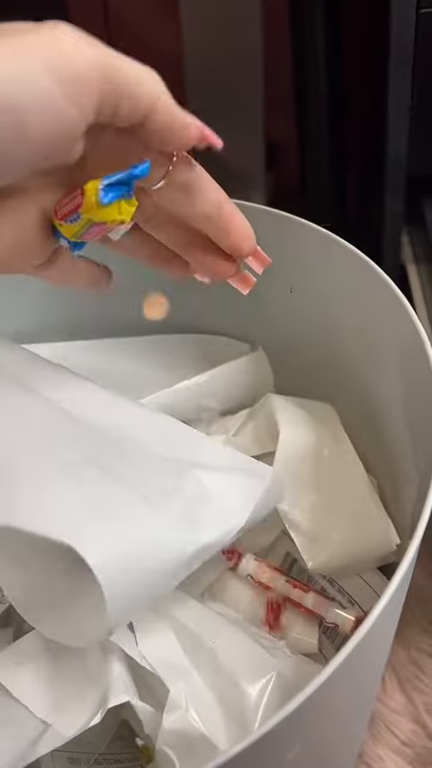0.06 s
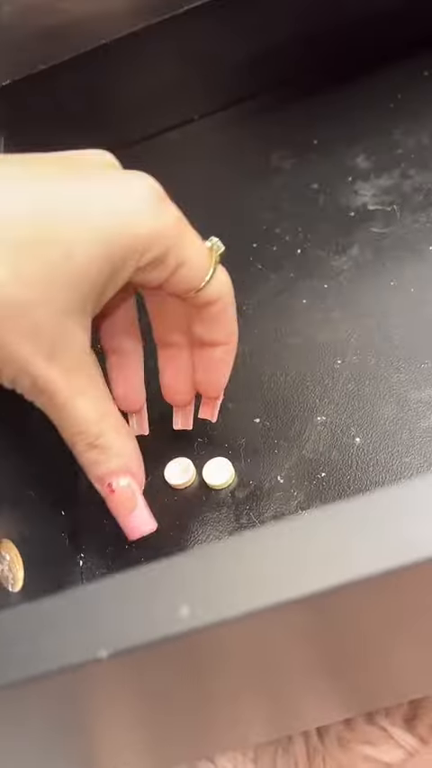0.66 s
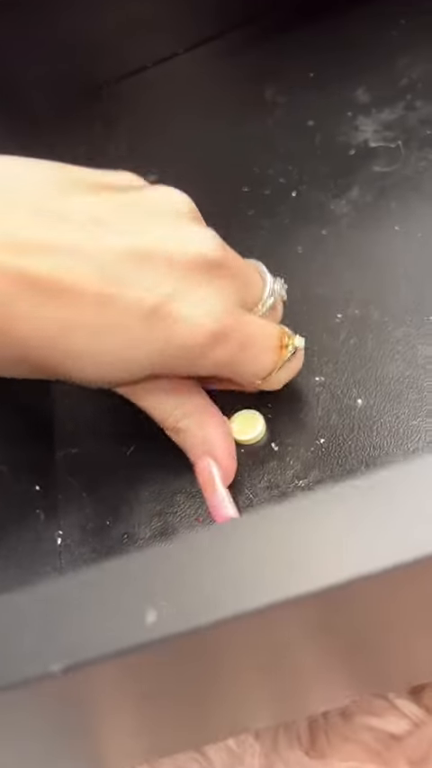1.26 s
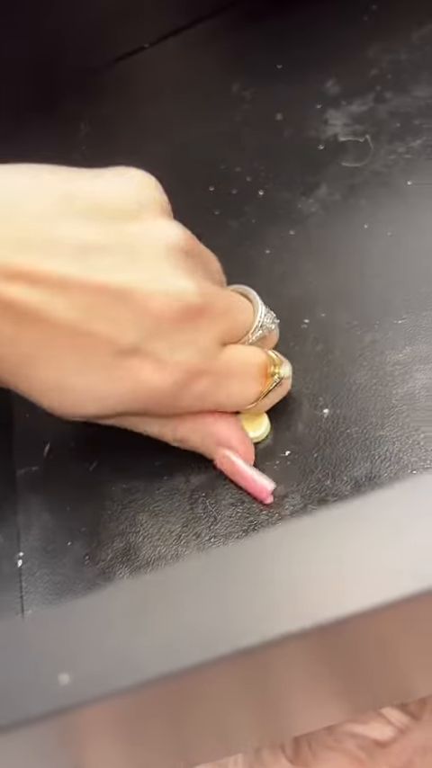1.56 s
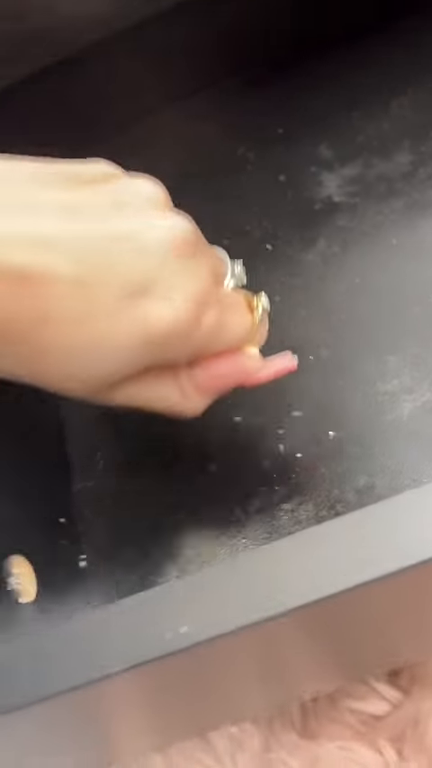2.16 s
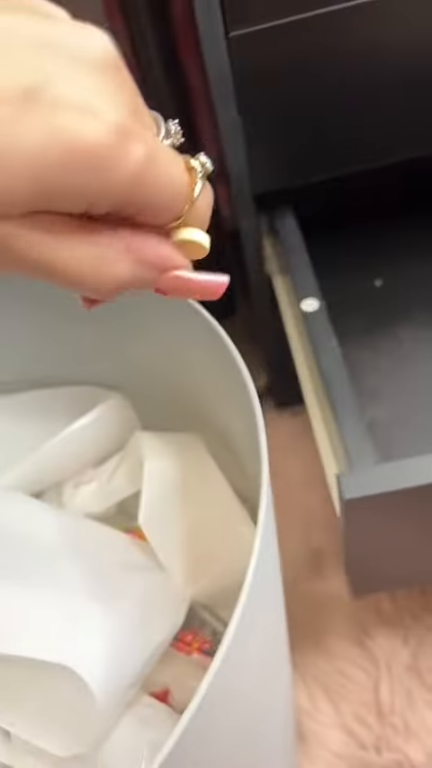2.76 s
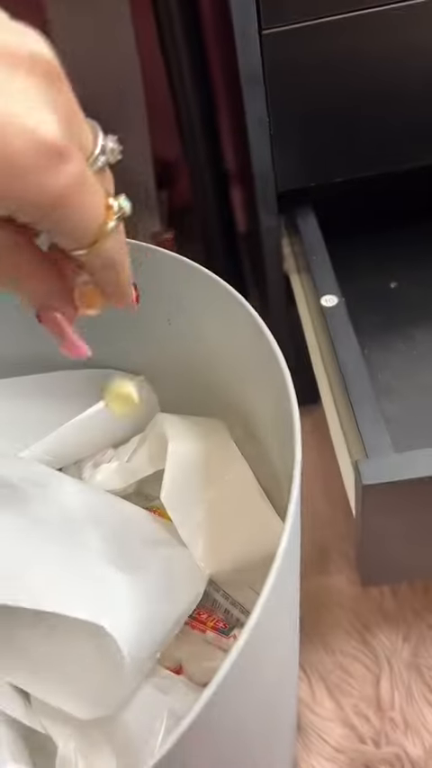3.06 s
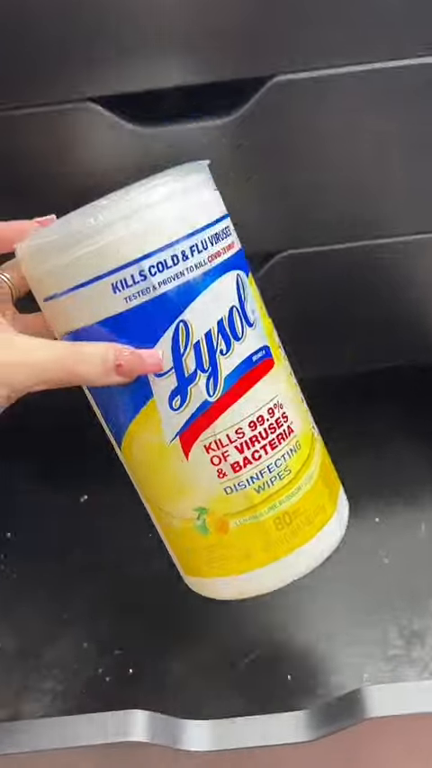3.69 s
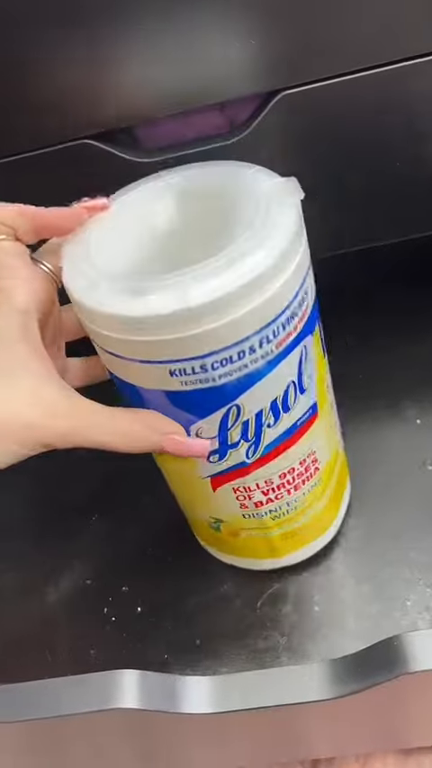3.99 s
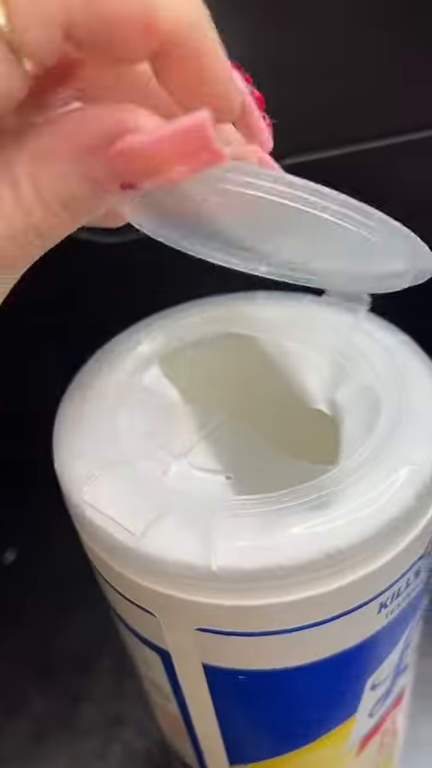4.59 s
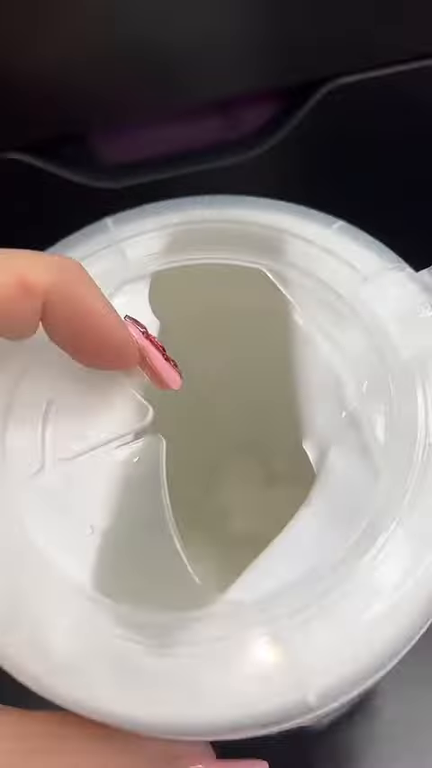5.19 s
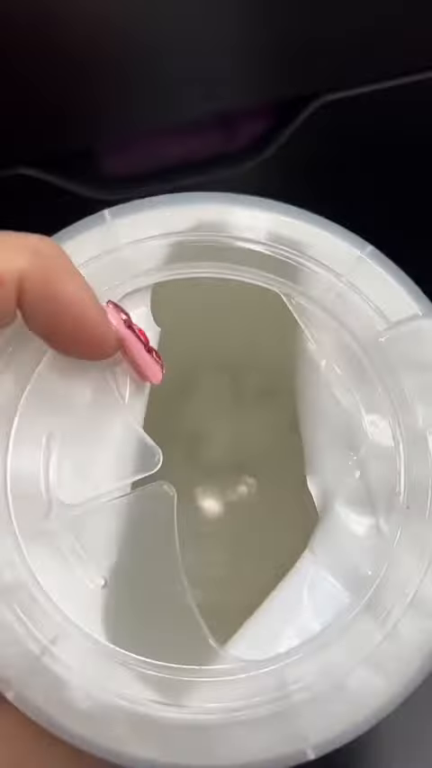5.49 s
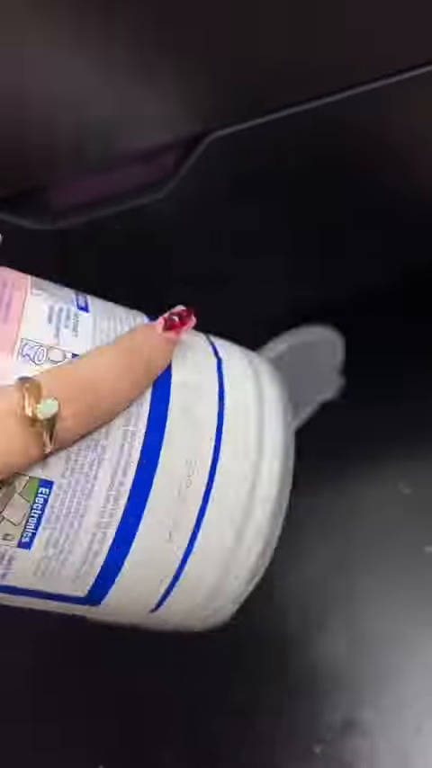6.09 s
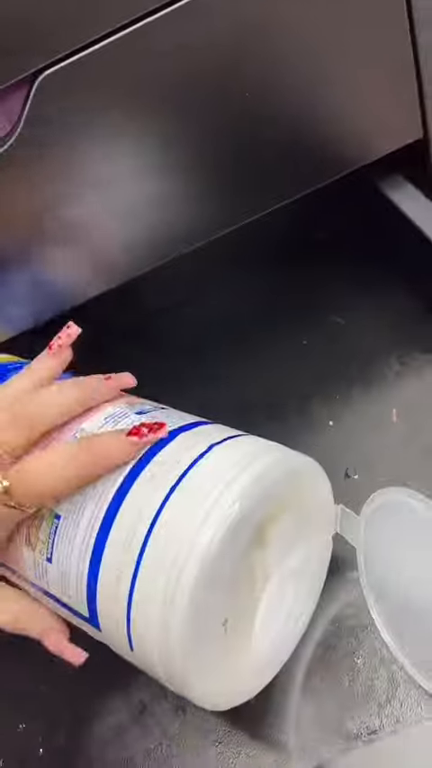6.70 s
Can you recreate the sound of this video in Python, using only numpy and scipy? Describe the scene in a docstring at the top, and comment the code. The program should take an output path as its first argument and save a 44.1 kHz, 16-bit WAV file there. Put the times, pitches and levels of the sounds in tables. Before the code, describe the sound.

Close up in a small, soft-sounding room, candies land in a wastebasket with light clicks, little thumps and a crinkle of paper. Quiet scrapes and taps of fingernails on a drawer follow, then a second short clatter in the bin. The low room hum recedes as a plastic canister is handled: finger rubs, sparse lid snaps, and finally a quick run of hollow knocks with a short scraping roll.

```python
"""Candies, bin and wipes canister

Close to the microphone in a small, soft room with a low hum, hard candies drop into a paper-filled
plastic bin, and long nails slide and pinch more of them off a drawer bottom. A plastic wipes canister
is picked up, snapped open, tipped over and knocked about on the drawer. Blows ring each object's modes;
rubbing is a stream of tiny slips. It all comes in five stretches with short silences between."""
import sys
import numpy as np
from scipy import signal
from scipy.fft import rfft, irfft, next_fast_len
from scipy.io import wavfile

SR = 44100
rng = np.random.default_rng(int(sys.argv[2]) if len(sys.argv) > 2 else 0)


def pcm_store(signal):
    """Save signal as 16-bit PCM."""
    levels = np.round(np.clip(np.atleast_2d(signal), -1, 1) * 32767)
    wavfile.write(sys.argv[1], SR, levels.astype(np.int16).T)


N = 302085

# Candies landing in the bin, close by. Each row: start in seconds, strength in dB, brightness in dB
# per octave, thump in dB, resonance of the struck spot in Hz, nominal t60 in seconds.
BIN_HITS = [(.014, -52.5, -3.7, 7, 191, 0.023), (0.07, -51.5, 5, 0.5, 1800, 0.032),
            (0.0982, -34, -.5, 6, 187, 0.1), (0.1432, -50.5, 4, 3.5, 5070, 0.015),
            (0.18, -45.5, 1, 10.5, 189, 0.2), (.209, -41.5, -.6, -1.5, 193, .057),
            (.234, -36.5, -1.5, 2, 3040, 0.056), (0.2788, -42.5, 5.5, -2, 4200, 0.034),
            (0.3125, -36, 1.5, -11, 1570, 0.071), (.3279, -37.5, 3.5, 6.5, 5080, .08),
            (0.337, -40, 2.1, -2.5, 2710, 0.12), (.371, -42, 4.5, 8.5, 4320, .028),
            (0.4163, -36.5, 2.5, 4.5, 212, 0.034), (.493, -32.5, 1.1, -15, 2090, 0.016),
            (0.5066, -43.5, 1, -4, 1510, .08), (0.535, -39.5, -2.4, -4, 200, .08),
            (0.6508, -54, -5.5, -8, 970, .021), (3.1682, -37.5, 0.7, -8, 3200, 0.033),
            (3.2546, -48, 2.5, -12, 1940, 0.017), (3.3106, -40.5, 1, 2.5, 3630, 0.052),
            (3.3404, -31, 3.4, 9, 2440, 0.023), (3.3776, -43.5, -2.5, -12, 191, .041),
            (3.4135, -59, 7, 25.5, 2150, .033), (3.4746, -39.5, 1.2, -14, 2950, 0.041),
            (3.4952, -44.5, -1.3, 2, 180, .058), (3.534, -50.5, -1, -10, 1015, 0.016)]
# The bin wall's modes. Each row: pitch in Hz, relative level in dB, nominal t60 in seconds.
BIN_MODES = [(181.5, 3.5, 0.076), (218, -7, 0.084), (448, 1, 0.059), (790, -4.5, 0.076),
             (1006, -11.5, 0.055), (1640, -7, 0.02), (1880, -2.5, 0.022), (2102, 7, 0.017),
             (2587, -1.5, 0.052), (3380, -7, 0.015), (4040, -5.5, .02), (4800, -1.5, 0.016)]
# Paper and wrappers giving way under the two drops.
# Each row: time in seconds, level in dB, brightness in dB per octave.
FIRST_CRUMPLE = [(0, -38.5, -1), (.11, -43.5, 1), (.22, -45, 0.5), (.26, -57, -8), (.305, -48.5, -0.5),
                 (.33, -38.5, -1), (.4, -40.5, -2.5), (.45, -50, -0.5), (.66, -51, -1)]
SECOND_CRUMPLE = [(3.166, -34.5, 1.8), (3.18, -34, 1.6), (3.201, -49.5, 0.23), (3.305, -58.5, 0.27),
                  (3.35, -39.5, -0.51), (3.4, -55, 0.23), (3.45, -76, 0), (3.49, -47, -1),
                  (3.54, -62, -0.54)]


def waste_bin():
    """Candies fall on crumpled paper and against the bin wall, which booms."""
    drops = blows(BIN_HITS, BIN_MODES, colour_db=(0.5, -2, 0, 0.5, -8), impact_db=24,
                  focus_db=3, spot_db=0, ping_db=-2.5, spot_q=2.4,
                  graze_db=10, graze_s=0.0014, hardening=0.56, crack_db=6.5, crack_t60=0.0027,
                  rattle_db=12.5, low_stretch=0.62, tail_db=-8, tail_t60=0.092)
    paper = friction([FIRST_CRUMPLE, SECOND_CRUMPLE], BIN_HITS, BIN_MODES,
                     colour_db=(-0.5, -2, -0.5, 2.5, -1.5), slips_per_s=300, scatter_db=2.5,
                     slip_t60=0.0079, hiss_db=1, ring_db=-8.5, spot_db=-16, edge_s=0.004)
    return drops + boom() + paper


def boom(hz=182, boost_db=2, t60=0.11):
    """Every landing flexes the whole bin, which booms for longer than its wall rings."""
    out = np.zeros(N)
    for start, strength_db, _, thump_db, _, _ in BIN_HITS:
        add(out, start, ring([(hz, boost_db + strength_db + thump_db, t60)], 1, detune=0.048))
    return out


# Taps on the drawer bottom, the board's modes, and candies pushed across it, also close by.
# Rows read like the bin's hits, modes and crumples.
DRAWER_HITS = [(0.9664, -65, 3.2, 0, 4000, 0.061), (1.0206, -63.5, 2.4, -3, 2820, 0.13),
               (1.0815, -53.5, 0.4, -6, 2130, 0.076), (1.3789, -53.5, 2, -4, 860, 0.16),
               (1.4874, -36.5, -2.6, -17, 873, 0.059), (1.6192, -51, -.5, -7, 747, 0.36),
               (1.7247, -43.5, 1.8, -3, 784, 0.082), (1.7366, -41.5, 1.4, -2, 726, 0.066),
               (3.034, -76.5, 5, 0, 8600, .06)]
DRAWER_MODES = [(222, -2, 0.11), (320, -16.5, 0.088), (546, -9, 0.045), (660, -6, 0.1), (781, 1, 0.044),
                (910, -5, 0.024), (2130, -9, .012), (4050, -16.5, 0.02), (5650, -9, .012)]
CANDY_PUSH = [(.97, -62, 1), (1.07, -53.5, 2.5), (1.15, -44.5, 1.1), (1.22, -49.5, -0.87),
              (1.32, -49.5, -0.41), (1.36, -56, -1.2), (1.4, -45.5, -1.6), (1.69, -59, 0.32),
              (1.76, -55, -1.2)]


def drawer():
    """Nails push the candies together and pinch them off the board."""
    taps = blows(DRAWER_HITS, DRAWER_MODES, colour_db=(-1, 2.5, 1, 2, -2.5), impact_db=29,
                 focus_db=6, spot_db=4.5, ping_db=-11, spot_q=9.1,
                 graze_db=9, graze_s=0.0015, hardening=0.13, crack_db=-3, crack_t60=0.00773,
                 rattle_db=12, low_stretch=1.6, tail_db=-16, tail_t60=0.39)
    slides = friction([CANDY_PUSH], DRAWER_HITS, DRAWER_MODES,
                      colour_db=(-5.5, -4, 1, -5.5, -11), slips_per_s=790, scatter_db=-4,
                      slip_t60=0.021, hiss_db=-5, ring_db=-7.5, spot_db=-4, edge_s=0.02)
    return taps + slides


# The canister near the microphone: lid snaps and knocks, its modes, and its roll on the drawer.
# Rows read like the bin's hits, modes and crumples.
CANISTER_HITS = [(3.8886, -41, 0, -1, 521, 0.072), (4.0829, -54, -0.7, 2, 4260, 0.021),
                 (4.1391, -57, 2.7, 0.5, 3170, 0.021), (4.3894, -58, -5.5, 1, 930, 0.025),
                 (4.43, -45, -4.5, -4.5, 271, 0.046), (4.5297, -36, -3.5, -3.5, 2200, 0.015),
                 (4.5946, -62, -1, 8, 2066, 0.019), (4.79, -33.5, 0.05, 3, 270, 0.019),
                 (4.829, -48.5, -2.2, -0.5, 308, .11), (5.285, -67, -2.5, 1.5, 262, 0.037),
                 (5.6996, -31, -1.2, -1, 519, 0.05), (5.784, -59, -1, 11.5, 155, .042),
                 (5.848, -43.5, -2, -12, 154, 0.028), (6.0709, -30, -7, -16, 1256, 0.04),
                 (6.264, -51, 0, 11.5, 342, 0.079), (6.343, -33.5, -2.5, -4, 335, 0.035),
                 (6.4389, -36.5, -4.5, -19, 375, 0.038), (6.4609, -35.5, -3.5, -17, 230, 0.056),
                 (6.4945, -34.5, -4, 6, 324, .092), (6.5964, -34.5, -2.5, 7.5, 482, .069),
                 (6.6333, -36.5, -2.5, -16, 390, 0.045), (6.6389, -31.5, -8, -8, 325, 0.029),
                 (6.6482, -42.5, 3, 0, 333, 0.05), (6.7034, -43, -1, 3.5, 473, 0.068),
                 (6.746, -54.5, -1.5, 1.5, 220, .043)]
CANISTER_MODES = [(138.4, -4.5, 0.082), (221.3, -2, 0.088), (271, -8, 0.058), (336, 2, 0.078),
                  (404, 1.5, 0.03), (483.4, 0, 0.053), (538, -3.5, 0.041), (622, -10, 0.016),
                  (873, 3, 0.04), (1063, 5.5, 0.051), (1250, -12, 0.026), (1630, -12, 0.03),
                  (2246, 15, 0.029), (3018, 18.5, 0.0057), (4440, -5, 0.019)]
CANISTER_ROLL = [(6.435, -44, -3.5), (6.53, -40, 1), (6.635, -38, 0.3), (6.652, -25.5, 0.5),
                 (6.672, -29.5, -0.8)]
# Brief hissy swells just before two lid clicks (at 4.119 and 4.512 s); the other rows are finger rubs.
# Each row: start and end in seconds, level in dB, brightness in dB per octave.
RUBS_AND_SWELLS = [(3.881, 3.916, -43.5, -1.5), (3.927, 4.009, -61, 0), (4.026, 4.078, -65.5, -0.5),
                   (4.119, 4.132, -57, 4.5), (4.339, 4.417, -58, -2), (4.512, 4.538, -45.5, 2),
                   (4.753, 4.803, -40.5, -1.3), (4.784, 4.88, -53.5, -1), (5.174, 5.2, -64.5, -3.5),
                   (5.613, 5.648, -54, 2.7), (5.687, 5.718, -40, -6), (5.735, 5.844, -68, 3.5),
                   (5.837, 5.953, -49.5, -2), (6.031, 6.057, -58, 3), (6.103, 6.12, -42.5, -0.5),
                   (6.13, 6.312, -65, -.6), (6.325, 6.38, -41, -2.5), (6.7, 6.784, -55.5, -3)]


def canister():
    """The hollow canister snaps, knocks, scrapes and rolls."""
    knocks = blows(CANISTER_HITS, CANISTER_MODES, colour_db=(-6.5, -4.5, -0.5, 0, -7), impact_db=27,
                   focus_db=11, spot_db=2, ping_db=5, spot_q=3.8,
                   graze_db=15, graze_s=0.0038, hardening=0, crack_db=18, crack_t60=0.0071,
                   rattle_db=18.5, low_stretch=0.6, tail_db=-12.5, tail_t60=0.12)
    spans = [[(start, db, tilt), (end, db, tilt)] for start, end, db, tilt in RUBS_AND_SWELLS]
    rustle = friction(spans + [CANISTER_ROLL], CANISTER_HITS, CANISTER_MODES,
                      colour_db=(0, 2, 0.5, -0.5, -16.5), slips_per_s=1000, scatter_db=6,
                      slip_t60=0.018, hiss_db=-8, ring_db=-7.5, spot_db=-13.5,
                      edge_s=0.013, edge_share=0.084)
    return knocks + rustle


# Edges in Hz of the five bands of every colour_db: boom, body, knock, click, tick.
EDGES_HZ = [125, 280, 700, 1600, 5000, 16000]
BANDS = [signal.butter(3, pair, "band", fs=SR, output="sos") for pair in zip(EDGES_HZ, EDGES_HZ[1:])]
BAND_OCTAVES = np.log2(np.sqrt(np.multiply(EDGES_HZ[1:], EDGES_HZ[:-1])) / 1000)  # centres, from 1 kHz
BLOW_SAMPLES, RING_SAMPLES = int(0.025 * SR), int(0.2 * SR)
RING_TIME = np.arange(RING_SAMPLES) / SR


def blows(hits, modes, colour_db, impact_db, focus_db, spot_db, ping_db, spot_q, graze_db, graze_s,
          hardening, crack_db, crack_t60, rattle_db, low_stretch, tail_db, tail_t60):
    """Each blow grazes, cracks, then rings with the object's main modes and dense panel modes."""
    out, t = np.zeros(N), RING_TIME
    crack = undb(crack_db) * fade(t, crack_t60)
    tail = undb(tail_db) * fade(t, tail_t60)
    for start, strength_db, brightness_db, thump_db, spot_hz, t60 in hits:
        ping = np.sqrt(spot_hz / 1000) * ring([(spot_hz, ping_db, t60)], 0.87, detune=0)
        body = ring(modes, np.sqrt(t60 / 0.04), detune=0.02)
        tone = np.pad(ping + body, (BLOW_SAMPLES, 0))
        tone[BLOW_SAMPLES] += undb(impact_db)  # the hard contact is a single pulse
        # Contact builds up before the blow; hardening shortens this for blows above a medium -40 dB.
        build_s = graze_s * undb(-40 - strength_db) ** hardening
        graze = undb(graze_db) * np.exp(-t[:BLOW_SAMPLES] / max(build_s, 1e-4))[::-1]
        grit = rng.standard_normal(len(tone))
        from_spot = (BAND_OCTAVES - np.log2(spot_hz / 1000)) / 0.87  # focus width in octaves
        levels_db = strength_db + np.array(colour_db) + brightness_db * BAND_OCTAVES
        levels_db += focus_db * np.exp(-from_spot ** 2)
        levels_db[0] += thump_db
        for k, (band, db) in enumerate(zip(BANDS, levels_db)):
            # The panels damp lows and highs at different rates.
            rattle = undb(rattle_db) * fade(t, t60 * low_stretch ** (1 - k / 2))
            blow = tone + grit * np.concatenate([graze, crack + rattle + tail])
            part = signal.sosfilt(band, touched_spot(blow, spot_hz, spot_db, spot_q))
            attack_rms = np.sqrt(np.mean(part[BLOW_SAMPLES:2 * BLOW_SAMPLES] ** 2))
            add(out, start - BLOW_SAMPLES / SR, part * undb(db) / attack_rms)
    return out


def friction(moves, hits, modes, colour_db, slips_per_s, scatter_db, slip_t60, hiss_db, ring_db,
             spot_db, edge_s, edge_share=0):
    """Tiny uneven slips, each a burst that rings the object, follow a move's level and brightness."""
    out = np.zeros(N)
    slipping = rng.random(N) < slips_per_s / SR
    slips = slipping * undb(scatter_db * np.minimum(rng.exponential(size=N), 3))
    bursts = unit(signal.fftconvolve(slips, fade(RING_TIME, slip_t60))[:N])
    grit = (bursts + undb(hiss_db)) * rng.standard_normal(N)
    for move in moves:
        times, level_db, brightness_db = np.transpose(move)
        start, end = times[0], times[-1]
        edge = max(int((edge_s + edge_share * (end - start)) * SR), 2)  # fade in and out
        first = max(int(start * SR) - edge // 2, 0)
        contact = grit[first:first + max(int((end - start) * SR), edge) + edge]
        n = len(contact)
        from_ends = np.minimum(np.arange(n), np.arange(n)[::-1])
        contact = contact * np.minimum(from_ends / edge, 1)
        body = ring(modes, 1, detune=0.086)
        rub = signal.fftconvolve(contact, body * undb(ring_db) / np.linalg.norm(body))
        rub[:n] += contact
        # It rubs on the spot of the blow nearest in time.
        *_, spot_hz, _ = min(hits, key=lambda hit: abs(hit[0] - (start + end) / 2))
        rub = touched_spot(rub, spot_hz, spot_db, q=4.8)
        now = (first + np.arange(len(rub))) / SR
        for band, octave, db in zip(BANDS, BAND_OCTAVES, colour_db):
            part = signal.sosfilt(band, rub)
            gain = undb(db + np.interp(now, times, level_db + brightness_db * octave))
            add(out, first / SR, part * gain * np.sqrt((n - edge) / np.sum(part ** 2)))
    return out


def ring(modes, t60_scale, detune):
    """Damped modes, detuned a little by each new grip."""
    out = 0
    for hz, db, t60 in modes:
        hz *= 1 + detune * rng.standard_normal()
        gain = rng.choice([-1, 1]) * undb(db)
        out += gain * np.sin(2 * np.pi * hz * RING_TIME) * fade(RING_TIME, t60 * t60_scale)
    return out


def touched_spot(x, hz, boost_db, q):
    """The place that is touched has a resonance of its own."""
    return x + undb(boost_db) * signal.lfilter(*signal.iirpeak(hz, q, fs=SR), x)


def room_echo(x, wet_db, t60, dull_hz):
    """A weak, short, dull echo comes back from the furniture and walls."""
    t = np.arange(2 * RING_SAMPLES) / SR
    tail = rng.standard_normal(len(t)) * fade(t, t60) * np.minimum(t / 0.002, 1)
    tail = signal.sosfilt(signal.butter(1, dull_hz, fs=SR, output="sos"), tail)
    return x + undb(wet_db) * signal.fftconvolve(x, tail / np.linalg.norm(tail))[:N]


# The room behind the handling. Each row: frequency in Hz, relative level in dB.
RUMBLE_SPECTRUM = [(15, -35), (25, -5), (89, 0), (157, -13), (229, -15.5), (270, -21.5), (354, -19),
                   (416, -25), (545, -26.5), (1070, -29.5), (1160, -34.5), (1840, -33.5), (3250, -43),
                   (14000, -61), (16000, -63.5)]
AIR_SPECTRUM = [(15, -30), (25, 0), (70, -12.5), (137, -1.5), (195, -22.5), (373, -15.5), (427, -24),
                (887, -25), (988, -31), (1100, -30), (1330, -27), (16000, -64)]
# Hum and hiss in the rumble. Each row: centre in Hz, width in Hz, nominal level in dB.
HUM_BANDS = [(42.7, 8, -53), (360.2, 6.9, -62), (1075.5, 27, -66.5), (1950, 520, -69), (13900, 4700, -77.5)]


def room_tone():
    """Two steady beds of noise: a humming rumble and quieter air."""
    rumble = undb(-42.5) * coloured(RUMBLE_SPECTRUM)
    for hz, width_hz, db in HUM_BANDS:
        rumble += undb(db) * noise(lambda f: 1 / (1 + (2 * (f - hz) / width_hz) ** 2))
    return rumble, undb(-55) * coloured(AIR_SPECTRUM)


def coloured(spectrum, low_cut_hz=34):
    """Steady noise with the given spectrum and no deep bass."""
    return noise(lambda f: curve_gain(f, spectrum) / np.sqrt(1 + (low_cut_hz / f) ** 10))


def noise(gain_at):
    """Steady noise whose spectrum follows a function of frequency."""
    n = next_fast_len(N, real=True)
    hz = np.maximum(np.arange(n // 2 + 1) * SR / n, 1)
    return unit(irfft(rfft(rng.standard_normal(n)) * gain_at(hz), n)[:N])


def curve_gain(f, points):
    """Gain at frequencies f along a curve of (Hz, dB) points."""
    hz, db = np.transpose(points)
    return undb(np.interp(np.log(f), np.log(hz), db))


def undb(db):
    """Decibels to gain."""
    return 10 ** (np.asarray(db) / 20)


def unit(x):
    """Scale to rms 1."""
    return x / np.sqrt(np.mean(x ** 2) + 1e-20)


def fade(t, t60):
    """Exponential decay, 60 dB down after t60."""
    return np.exp(-np.log(1000) * t / max(t60, 1e-3))


def add(out, start, x):
    """Mix x into out from start seconds on."""
    i = max(int(start * SR), 0)
    out[i:i + len(x)] += x[:max(N - i, 0)]


# The stretches with sound. Each row: start and end in seconds.
STRETCHES = [(0, .662), (.786, 3.542), (3.672, 4.147), (4.288, 5.032), (5.165, 6.9)]
# Room tone in each stretch. Each row: rumble gain in dB, air gain in dB.
STRETCH_TONE = [(-1, 4.5), (0.5, -10), (-16.5, -9), (-18.5, 0), (-14.5, -4.5)]


def scene():
    """Close handling over the room tone; everything falls silent between the stretches."""
    handling = room_echo(waste_bin() + drawer() + canister(), wet_db=-25.5, t60=0.16, dull_hz=4000)
    rumble, air = room_tone()
    out, t = np.zeros(N), np.arange(N) / SR
    for (start, end), (rumble_db, air_db) in zip(STRETCHES, STRETCH_TONE):
        gate = np.clip(np.minimum(t - start, end - t) / 0.0014, 0, 1)
        out += gate * (handling + undb(rumble_db) * rumble + undb(air_db) * air)
    return out[None]


# Overall treble colour. Each row: frequency in Hz, gain in dB.
TREBLE_COLOUR = [(1000, -0.5), (3000, 0), (5000, -0.5), (7800, 1.5), (9300, -5), (11000, -10.5),
                 (13500, -7), (15500, -9)]


def record(dry):
    """The treble dips near 11 kHz and the top is cut off."""
    hz = np.maximum(np.arange(N // 2 + 1) * SR / N, 1)
    heard = irfft(rfft(dry) * curve_gain(hz, TREBLE_COLOUR), N)
    top_cut = signal.ellip(8, 0.2, 70, 15850, fs=SR, output="sos")
    return signal.sosfilt(top_cut, heard)


dry = scene()
out = record(dry)
pcm_store(out)
```